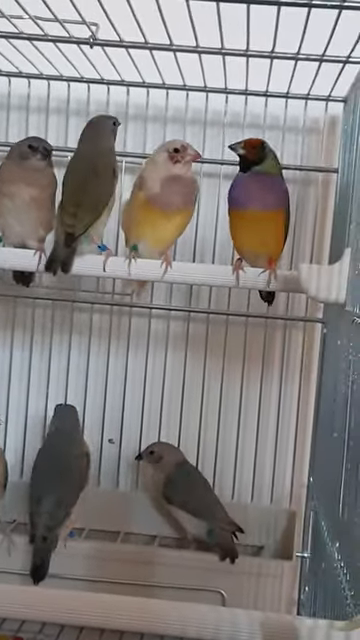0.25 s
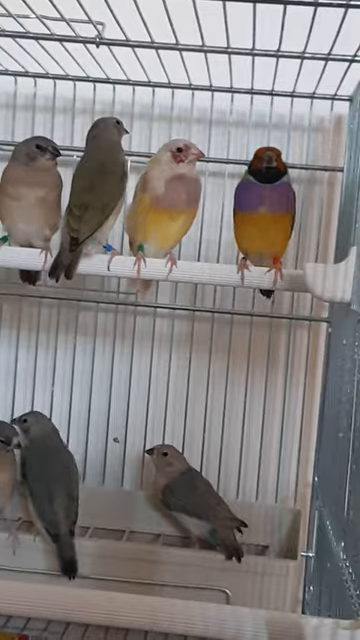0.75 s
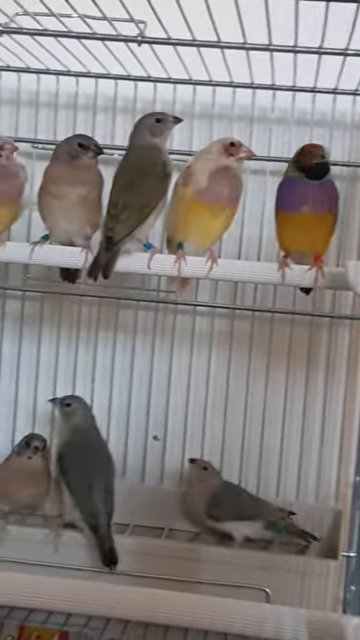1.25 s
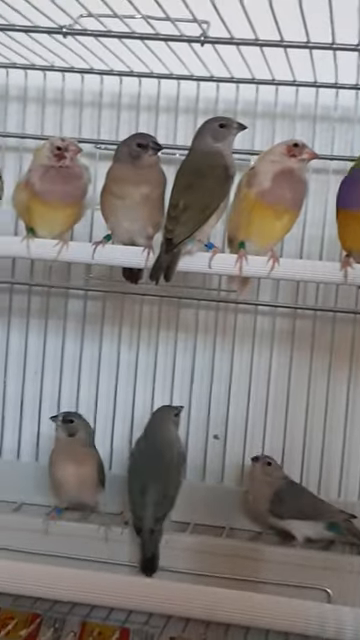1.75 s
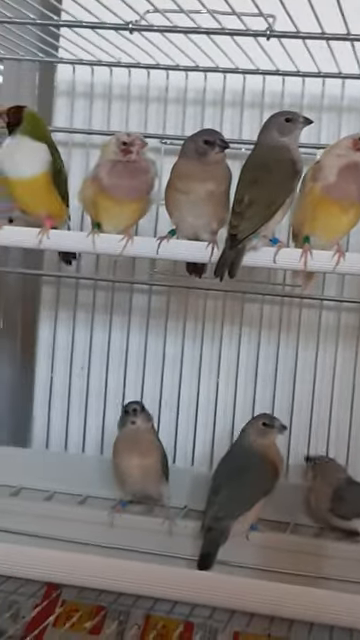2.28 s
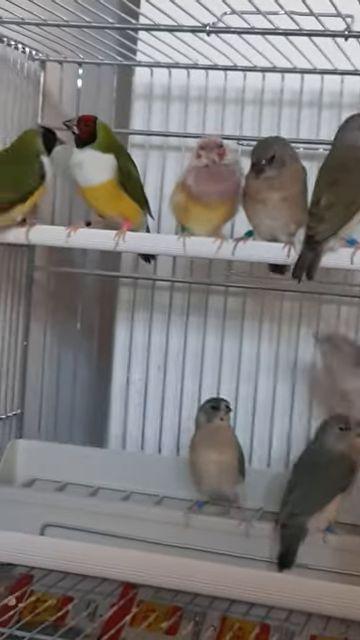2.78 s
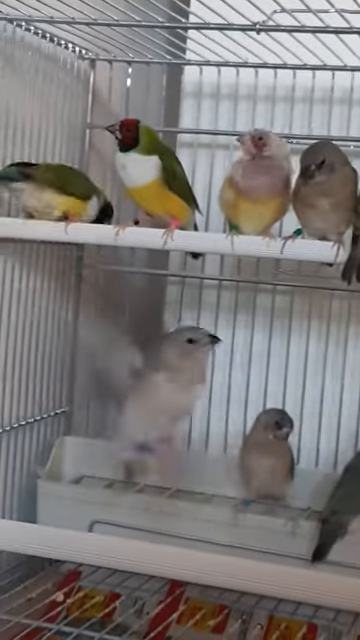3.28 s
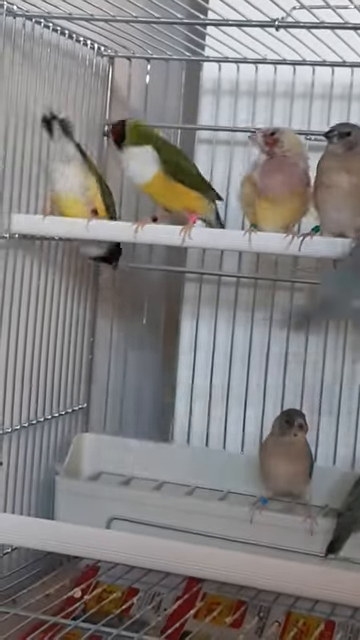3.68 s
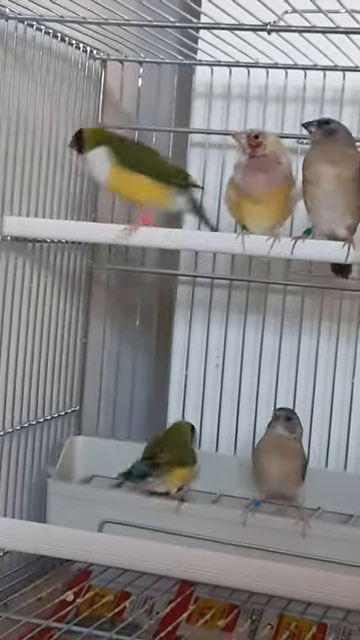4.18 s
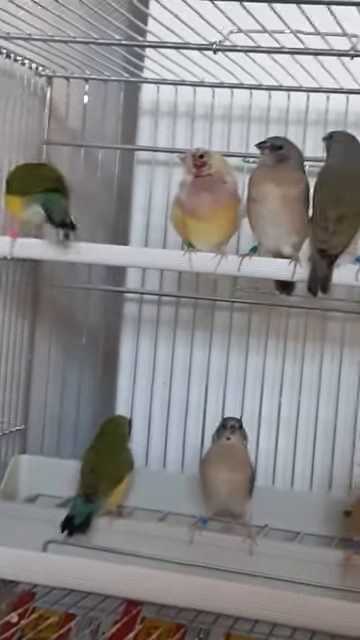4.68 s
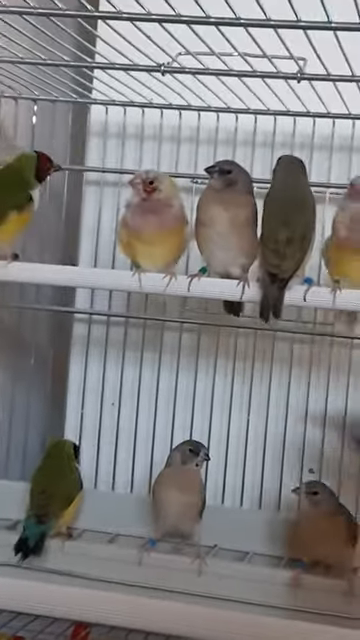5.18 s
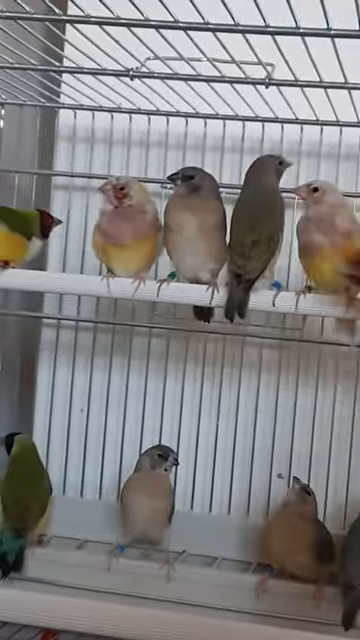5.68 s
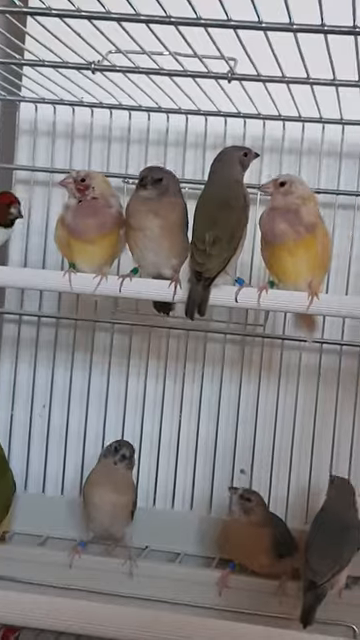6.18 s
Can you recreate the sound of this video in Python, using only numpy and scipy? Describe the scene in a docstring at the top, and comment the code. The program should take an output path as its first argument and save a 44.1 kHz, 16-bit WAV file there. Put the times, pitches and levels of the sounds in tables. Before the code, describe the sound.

Finches move about a wire cage in a small, hard room with a soft, low rumble. Faint calls and light claw ticks open, then one high, wavering call comes at about 1 second with soft fluttering and scuffing. From 2.1 seconds one bird sings a thin song of quick upward flicks, nasal notes and falling, buzzy whistles. Wing flapping swells from 3 to 4 seconds, and a puff of air thumps the microphone's right side at 3.3. Claws tick on the wires, and feet knock on a hollow plastic feeder at 4 seconds, more softly at 5.2. The song is loudest from 4.4 to 4.8 seconds, with short held whistles, then turns reedy as wings briefly thrum near 5. It ends with a falling note at about 5.3. Another flutter comes at 5.9 seconds, with faint, hoarse calls from farther off around 5.8 and 6.3.

```python
"""A small, hard room with finches in a wire cage. One sings a thin song of upward flicks, nasal notes
and falling, buzzing whistles; others call. Their voices come from the syrinx, a bird's voice box, where
thin membranes vibrate. Wings push air and swish as birds flutter past, and one wing gust hits the
right side of the microphone. Claws tick on the wires, feet knock on the feeder, and the room rumbles."""
import sys
import numpy as np
from scipy import signal
from scipy.fft import rfft, irfft, next_fast_len
from scipy.io import wavfile
from scipy.ndimage import map_coordinates

SR = 44100
rng = np.random.default_rng(int(sys.argv[2]) if len(sys.argv) > 2 else 0)


def wav_record(signal):
    """Record a signal, one row per channel, as 16-bit PCM in the file named by sys.argv[1]."""
    frames = np.transpose(np.atleast_2d(signal))
    bounded = np.clip(frames, -1, 1)
    # unit amplitude maps onto the largest positive 16-bit level
    quanta = np.round(bounded * 32767).astype(np.int16)
    wavfile.write(sys.argv[1], SR, quanta)


N = 284004

# Levels in all tables are relative. A "shape" traces one note. Each row of a shape: time in seconds,
# pitch in Hz, level in dB. Playing it can shift all three.
# Rising syllables. Each row: time in seconds, lead-in level in dB, flick level in dB, pitch ratio.
RISES = [(2.128, -51, -87, .995), (2.276, -51, -37, 0.96), (2.446, -48.5, -34.5, 0.98),
         (2.594, -47.5, -34, 0.99), (3.336, -53, -58, 0.92), (3.513, -48.5, -49, 0.94),
         (3.670, -48, -39.5, .99), (3.864, -46.5, -31, 0.96), (4.572, -45, -29.5, 1.01),
         (4.719, -46, -25, 1)]
# Falling syllables. Each row: time in seconds, then the levels of pip, fall and buzz in dB.
FALLS = [(2.932, -34, -33, -44), (4.19, -31, -34, -41.5), (5.238, -37.5, -30, -46.5)]


def song():
    """The singer: sharp accents carry straight to the microphone, soft notes blend with the room."""
    # The open beak colours the whole song. Each row: frequency in Hz, gain in dB.
    beak = [(800, -0.5), (1100, -4.5), (1350, -7), (1900, 0.5), (2250, 1), (2550, -6), (3100, 1.5),
            (4600, -0.5), (5500, -1), (9000, 1.5), (12500, 5.5), (15500, 2)]
    sharp = flicks_and_pips() + falling_whistles()
    held = held_whistles_and_ring()
    soft = soft_notes() + reedy_notes() + thin_voice()
    echoes = room(amp(-4.5) * sharp + amp(-7.5) * held + amp(-5.5) * soft)
    direct = from_perch(sharp + amp(-1.5) * held + amp(-4) * soft)
    return coloured(direct + echoes, beak)


def flicks_and_pips():
    """Tiny, nearly pure whistles: upward flicks, and the pip that opens each falling syllable."""
    # The shapes of a flick and a pip. Each row: time in seconds, pitch in Hz, level in dB.
    flick = [(-.017, 3620, -20), (-.008, 4172, -11), (-.002, 4483, 0), (.002, 4654, -5), (.006, 4350, -30)]
    pip = [(0, 4600, -16.5), (.002, 4570, -2.5), (.006, 4570, 3.5), (.009, 4180, -13.5)]
    flicks = [(s, flick, db, ratio) for s, _, db, ratio in RISES]
    pips = [(s, pip, db, 1) for s, db, _, _ in FALLS]
    out = whistles(flicks, overtones_db=[-41, -47], flutter=0.019, rasp_db=-15, rasp_hz=298)
    return out + whistles(pips, overtones_db=[-46, -46], flutter=.004, rasp_db=-27, rasp_hz=400)


def falling_whistles():
    """Whistles that slide down, with faint overtones (multiples of the pitch)."""
    # The shape of the slide. Each row: time in seconds, pitch in Hz, level in dB.
    fall = [(.006, 3680, 6.5), (.011, 3286, -9.5), (.02, 3118, -6), (0.029, 2880, -9.5), (0.034, 2650, -6),
            (.042, 1840, -15), (0.053, 1695, -9)]
    # Lets overtones stand out near 7 and 13 kHz. Each row: frequency in Hz, gain in dB.
    colour = [(6800, -1), (8000, -8), (11000, -8), (12500, -3)]
    notes = [(s, fall, db, 1) for s, _, db, _ in FALLS]
    out = whistles(notes, overtones_db=[-31, -40, -27], flutter=0.022, rasp_db=-10, rasp_hz=399.3)
    return coloured(out, colour)


def held_whistles_and_ring():
    """Gently bending whistles, clear to hoarse, then a fading ring in the room after the loudest flick."""
    # Each row: start and length in seconds; first, middle and last pitch in Hz; level in dB;
    # loudest point as a share of the length; rasp in dB. The last two rows are the room's ring.
    notes = [(1.065, 0.044, 3080, 3430, 3570, -43.5, 0.97, -2.5),
             (3.741, 0.077, 3726, 3640, 3490, -49, 0.36, 8),
             (4.374, 0.0586, 3403, 3607, 3625, -29.5, 1, -30.5),
             (4.386, 0.049, 3060, 3144, 3310, -42, 0.53, 5),
             (4.455, 0.056, 3666, 3670, 3570, -36, .3, -25.5),
             (4.514, 0.07, 3436, 3820, 4300, -38.5, 0.27, -3),
             (4.655, 0.055, 3260, 3440, 3910, -34, 0.66, -3), (4.716, .09, 4050, 3973, 3790, -38, .2, -10),
             (4.808, 0.19, 3774, 3605, 3550, -47, 0.076, -5)]
    return sum(whistles(as_notes([sweep(*note)]), overtones_db=[-52, -54], flutter=0.0084,
                        rasp_db=rasp_db, rasp_hz=391) for *note, rasp_db in notes)


def soft_notes():
    """Raspy lead-ins to the flicks, buzzes after the falls, and nasal notes ending in a downward slur."""
    # The shapes of these four notes. Each row: time in seconds, pitch in Hz, level in dB.
    lead_in = [(-.088, 1768, -13.5), (-.06, 1787, -3.5), (-.035, 1890, -3.5), (-.01, 2021, -2.5)]
    buzz = [(.05, 395, -11.5), (.062, 391.8, 3), (.08, 378, -3.5), (.1, 349, -38)]
    nasal = [(-.004, 373.2, -15), (.01, 391, -6), (0.028, 411, -1), (0.056, 412, 1.5), (.08, 385, -1)]
    slur = [(.09, 7084, -16), (.1, 5600, 0.5), (.112, 4400, 6), (.125, 3400, -10), (.145, 3000, -3),
            (.155, 1873, -13), (.175, 1610, 1)]
    # Nasal syllables. Each row: time in seconds, nasal level in dB, slur level in dB.
    nasals = [(2.697, -46.5, -44), (3.95, -46, -42.5)]
    leads = [(s, lead_in, db, ratio) for s, db, _, ratio in RISES]
    slurs = [(s, slur, db, 1) for s, _, db in nasals]
    out = amp(-4.5) * whistles(leads, overtones_db=[2, -28], flutter=0.014, rasp_db=-4, rasp_hz=440)
    out += amp(-3.5) * whistles(slurs, overtones_db=[-19], flutter=0.051, rasp_db=-3, rasp_hz=800)
    out += buzzes([(s, db) for s, _, _, db in FALLS], buzz, flutter=0.031, tilt_db=-3)
    return out + buzzes([(s, db) for s, db, _ in nasals], nasal, flutter=0.02, tilt_db=3.5)


def reedy_notes(buzz_db=-1.5):
    """Reedy notes; the other side of the syrinx buzzes along at about a sixth of the pitch."""
    # Each row: start and length in seconds; first, middle and last pitch in Hz; level in dB;
    # loudest point as a share of the length; first overtone in dB; rasp in dB.
    notes = [(4.79, 0.18, 1902, 2310, 2207, -43, 0.31, -21, -11),
             (5.082, .095, 2343, 1879, 1607, -45.5, 0.092, -8, -18)]
    out = np.zeros(N)
    for *note, overtone_db, rasp_db in notes:
        shape = sweep(*note)
        out += whistles(as_notes([shape]), overtones_db=[overtone_db, -24, -30], flutter=0.014,
                        rasp_db=rasp_db, rasp_hz=520)
        out += buzzes([(0, buzz_db)], shape / [1, 6, 1], flutter=0.038, tilt_db=2.5)
    return out


def thin_voice():
    """A faint, raspy voice high above the song."""
    # Each row: start and length in seconds; first, middle and last pitch in Hz; level in dB;
    # loudest point as a share of the length.
    rows = [(3.235, 0.26, 6700, 7160, 7000, -55.5, 0.13), (4.707, 0.32, 6950, 6670, 7000, -57.5, 0.067),
            (4.9, .15, 7050, 7000, 6720, -57.5, 0.98)]
    notes = as_notes([sweep(*row) for row in rows])
    return whistles(notes, overtones_db=[-16], flutter=0.008, rasp_db=-0.5, rasp_hz=620)


def from_perch(x):
    """The straight path from the singer reaches the microphone's two sides unequally."""
    # Each row: frequency in Hz, how much louder the left is in dB.
    left_louder = [(800, 0.5), (2000, -7), (3100, 12), (3700, -1.5), (4500, 5), (7000, 3), (11000, -6)]
    # Each row: frequency in Hz, how far the left wave is ahead in radians.
    left_ahead = [(800, 1.2), (2000, 1.68), (3500, 2.07), (4500, 0.65), (11000, .7)]
    left = lambda hz: amp(along(left_louder, hz) / 2) * np.exp(.5j * along(left_ahead, hz))
    return filtered(x, lambda hz: np.array([left(hz), 1 / left(hz)]))


def syrinx(shape, ratio, flutter, flutter_rate):
    """Pitch, phase and loudness of one note; the membrane's flutter shakes the pitch a little."""
    s, hz, db = np.transpose(shape)
    s = np.sort(s)
    t = np.arange(s[0], s[-1] + .001, 1 / SR)
    pitch = ratio * np.interp(t, s, hz) * (1 + flutter * wobble(flutter_rate, len(t)))
    edges = np.clip(np.minimum(t - t[0], t[-1] - t) / .0015, 0, 1)  # short fades prevent clicks
    loudness = np.sqrt(2) * amp(np.interp(t, s, db)) * np.sin(edges * np.pi / 2) ** 2
    return pitch, 2 * np.pi * np.cumsum(pitch) / SR, loudness


def whistles(notes, overtones_db, flutter, rasp_db, rasp_hz):
    """Play notes (seconds, shape, dB, pitch ratio); an uneven rattle in the syrinx makes them rasp."""
    out = np.zeros(N)
    for s, shape, db, ratio in notes:
        pitch, phase, loudness = syrinx(shape, ratio, flutter, flutter_rate=700)
        wave = sum(amp(level) * np.exp(1j * k * phase) * (k * pitch < SR / 2)
                   for k, level in enumerate([0, *overtones_db], 1))
        jitter = lambda rate: wobble(rate, len(phase)) + 1j * wobble(rate, len(phase))
        rattle = amp(rasp_db) * (0.79 * jitter(2 * rasp_hz) + 0.53 * jitter(5 * rasp_hz))
        raspy = (wave * (1 + rattle)).imag / np.hypot(1, amp(rasp_db))
        add(out, s + shape[0][0], amp(db) * loudness * raspy)
    return out


def buzzes(notes, shape, flutter, tilt_db):
    """Play low, pulsing notes (seconds, dB) whose many overtones are tilted by tilt_db per octave."""
    # The throat colours the buzz. Each row: frequency in Hz, gain in dB.
    throat = [(380, -32), (780, -4.5), (1150, 3), (1500, 1.5), (1950, 2), (2450, -4.5), (3100, -7.5),
              (3800, -14.5), (4600, -1.5), (6000, -22), (8500, -40), (12000, -23.5), (15500, -36.5)]
    out, k = np.zeros(N), np.arange(1, 39)[:, None]  # k counts multiples of the pitch
    for s, db in notes:
        pitch, phase, loudness = syrinx(shape, ratio=0.96, flutter=flutter, flutter_rate=350)
        strengths = amp(along(throat, k * pitch) + tilt_db * np.log2(k))
        wave = (strengths * np.sin(k * phase + rng.uniform(0, np.pi, k.shape))).sum(0)
        add(out, s + shape[0][0], amp(db) * loudness * unit(wave) / np.sqrt(2))
    return out


def as_notes(shapes):
    """Make notes that keep their shapes' own times, levels and pitches."""
    return [(0, shape, 0, 1) for shape in shapes]


def sweep(s, length, start_hz, middle_hz, end_hz, db, crest):
    """Shape of a note whose pitch bends smoothly through three values."""
    progress = np.linspace(0, 1, 33)
    curve = np.polyfit([0, .5, 1], [start_hz, middle_hz, end_hz], 2)
    pitch = np.polyval(curve, progress)
    return np.column_stack([s + progress * length, pitch, swell(progress, db, crest)])


def scoop(s, length, hz, db, crest, overshoot=0.11, settle_s=.022):
    """Shape of a call that drops onto its pitch from above."""
    progress = np.linspace(0, 1, 33)
    pitch = hz * (1 + overshoot * np.exp(-progress * length / settle_s))
    return np.column_stack([s + progress * length, pitch, swell(progress, db, crest)])


def swell(progress, db, crest, rise_db=15, fade_db=12.5, roundness=1.46):
    """Level along a note (progress from 0 to 1): up to its loudest point, the crest, then down."""
    crest = np.clip(crest, .02, .98)
    away = np.interp(progress, [0, crest, 1], [1, 0, 1])
    return db - np.where(progress < crest, rise_db, fade_db) * away ** roundness


def long_call(waver_db=3):
    """Another finch gives one long, wavering call, rich in overtones."""
    # Its shape dips in pitch. Each row: time in seconds, pitch in Hz, level in dB.
    shape = [(1.075, 5250, -63), (1.081, 5280, -59), (1.117, 5430, -45), (1.155, 5070, -60),
             (1.205, 4333, -56), (1.385, 3790, -56.5), (1.409, 4540, -58.5), (1.437, 5180, -54.5),
             (1.45, 5240, -66)]
    call = whistles(as_notes([shape]), overtones_db=[-4, -11], flutter=.016, rasp_db=-10, rasp_hz=440)
    call *= amp(waver_db * wobble(89.9))
    return panned(amp(0.5) * call + amp(1) * room(call), left_db=3)


def far_calls():
    """Hoarse calls from farther off, heard mostly by way of the room."""
    # Each row: start and length in seconds, pitch in Hz, level in dB, loudest point from 0 to 1.
    calls = [(0, 0.033, 5810, -52.5, 0.062), (0.445, 0.12, 3570, -53, 0.41), (1.048, 0.058, 3543, -40, 1),
             (2.178, 0.063, 3570, -51, 1), (5.774, 0.093, 3610, -49.5, 0.91),
             (6.303, 0.11, 3553, -50, 0.73), (6.297, .13, 6250, -53.5, 0.87)]
    # The callers' tone colour. Each row: frequency in Hz, gain in dB.
    throat = [(2400, -12.5), (3400, 0), (4700, 1.5), (7000, -5)]
    notes = as_notes([scoop(*call) for call in calls])
    rasp = whistles(notes, overtones_db=[-22], flutter=0.0204, rasp_db=0, rasp_hz=1013)
    core = whistles(notes, overtones_db=[-28], flutter=0.018, rasp_db=-19, rasp_hz=195)
    voices = coloured(amp(-3) * rasp + amp(-8.5) * core, throat)
    return panned(amp(-8.5) * voices + amp(-5) * room(voices), left_db=6.5)


def wings(strokes_per_s=61, unevenness=.16, rise_s=0.048, fall_s=0.071):
    """Every up and down stroke pushes a lump of air and swishes the feathers."""
    # Bursts of wing beating. Each row: start and length in seconds, air push in dB, swish in dB.
    flutters = [(.01, 0.037, -52, -71.5), (0.92, 0.035, -75, -90), (1, 0.45, -62.5, -73),
                (1.572, 0.018, -58.5, -76), (1.764, 0.018, -54.5, -86), (1.85, 0.25, -58.5, -84.5),
                (2.224, 0.039, -59, -65), (2.544, 0.041, -50.5, -70), (2.984, 0.36, -45, -61.5),
                (3.475, 0.064, -40, -51.5), (3.671, 0.081, -39, -52.5), (3.84, 0.24, -57.5, -56.5),
                (4.186, 0.49, -57.5, -65), (4.546, .2, -64.5, -59.5), (4.874, .1, -53, -63),
                (5.098, 0.038, -61, -61.5), (5.27, 0.19, -59, -86), (5.58, 0.042, -51.5, -72),
                (5.889, 0.052, -40, -52.5), (6.393, .05, -60.5, -67.5)]
    # The tone colour of swishing feathers. Each row: frequency in Hz, level in dB.
    feathers = [(130, -6.5), (280, 0), (450, -1), (800, -7), (1500, -8.5), (3000, -13), (5500, -12.5),
                (8500, -16.5), (11500, -15.5), (15500, -23)]
    # The small steady gains are there because the flock is never quite still.
    air = amp(-72) + bursts([(s, length, db) for s, length, db, _ in flutters], rise_s, fall_s)
    rustle = amp(-84) + bursts([(s, length, db) for s, length, _, db in flutters], rise_s, fall_s)
    strokes = np.cumsum(strokes_per_s * np.exp(unevenness * wobble(14))) / SR  # a running count
    push = air_push(strokes)
    swish = feather_swish(strokes)
    return air * push + hover_thrum() + rustle * swish * noise(feathers)


def air_push(strokes, upstroke_db=-5.5):
    """One low thump a stroke, mixed with low noise; the upstroke pushes less air."""
    # The tone colour of pushed air. Each row: frequency in Hz, level in dB.
    colour = [(20, -39.5), (35, -7), (55, 4.5), (80, 5.5), (120, -3.5), (190, -6), (300, -15), (480, -24.5),
              (900, -32), (2000, -94)]
    count = np.floor(strokes)
    kicks = np.diff(count, prepend=0) * amp(upstroke_db * (count % 2) + 2.7 * wobble(45))
    thumps = -coloured(kicks, colour)
    return unit(unit(thumps) + amp(-2) * noise(colour))


def feather_swish(strokes, brushes_per_s=47, brush_s=0.0075, brush_db=1):
    """Loudness of the feathers: they swish most on the way down, and their tips brush at random."""
    stroke_db = 4 * np.cos(2 * np.pi * strokes) + 1.5 * np.cos(np.pi * strokes) + 1.5 * wobble(25)
    snaps = (rng.random(N) < brushes_per_s / SR) * rng.random(N)
    brushes = signal.lfilter([1], [1, -np.exp(-1 / (brush_s * SR))], snaps)  # each snap dies away
    return unit(amp(stroke_db) + amp(brush_db) * brushes)


def hover_thrum():
    """Wings thrum as a bird hovers by the bars."""
    # The thrum's shape. Each row: time in seconds, pitch in Hz, level in dB.
    shape = [(4.8, 128.8, -58), (4.85, 135.3, -51.5), (4.93, 115.7, -56.5), (4.98, 134, -49.5),
             (5.04, 149.4, -49.5), (5.09, 137, -56)]
    return whistles(as_notes([shape]), overtones_db=[-16], flutter=0.038, rasp_db=-8.5, rasp_hz=40.6)


def gust(start_s=3.3122, db=-7, rise_s=0.00024, fall_s=0.0071, cut_hz=56):
    """A puff of air strikes the microphone's right side; its bass cut makes the puff swing."""
    t = np.arange(SR // 5) / SR
    puff = -np.exp(-t / fall_s) * (1 - np.exp(-t / rise_s))
    bass_cut = signal.butter(4, cut_hz, "high", fs=SR, output="sos")
    out = np.zeros(N)
    add(out, start_s, amp(db) * signal.sosfilt(bass_cut, puff))
    return out * amp([[-28], [0]])


def cage_taps(tick_ring_s=0.054, knock_ring_s=0.032, attack_s=0.00077, scatter_db=1.5):
    """Claws and beaks tick on the wires, and landing feet make the hollow plastic feeder ring."""
    # Ticks on the wires and landings on the feeder. Each row: start in seconds, level in dB.
    ticks = [(0.093, -64), (0.8575, -55.5), (0.8827, -53.5), (0.9044, -51.5), (0.936, -56.5), (2.2145, -63),
             (2.248, -56), (3.3108, -38.5), (3.4705, -49), (3.5034, -46), (3.7815, -42.5), (4.0048, -39),
             (5.0355, -49.5), (5.088, -41.5), (5.235, -58), (5.9529, -47), (6.0072, -54.5)]
    landings = [(.886, -84), (0.904, -53), (4.005, -29.5), (4.011, -37.5), (5.238, -42.5), (5.862, -55)]
    # The tones the feeder rings with. Each row: frequency in Hz, level in dB.
    feeder = [(790, -6.5), (1080, -0.5), (1370, 2), (1490, -16.5), (1750, -7.5), (2040, -18.5)]
    out, t = np.zeros(N), np.arange(SR // 4) / SR
    rise = 1 - np.exp(-t / attack_s)
    for s, db in ticks:
        add(out, s, amp(db - 4 - 60 * t / tick_ring_s) * rise * rng.standard_normal(len(t)))
    for s, db in landings:
        ring = np.zeros(len(t))
        for hz, level in feeder:
            strength = amp(level + rng.normal(0, scatter_db))
            phase = 2 * np.pi * hz * t + rng.uniform(0, 2 * np.pi) + 1.24 * wobble(550, len(t))
            ring += strength * np.sin(phase)
        add(out, s, amp(db - 60 * t / knock_ring_s) * rise * unit(ring))
    return panned(out + amp(-2) * room(out), left_db=2.5)


def scuffs():
    """Shuffling feet rub the feeder in uneven bursts of noise."""
    # Each row: start and length in seconds, level in dB.
    shuffles = [(.87, 0.049, -66), (1.08, 0.022, -68), (1.7, 0.23, -76.5), (1.88, 0.052, -71.5)]
    # The tone colour of the rubbing. Each row: frequency in Hz, level in dB.
    colour = [(500, -37), (900, 0), (1300, 2), (1850, 3), (2300, -7), (3200, -44)]
    return bursts(shuffles, rise_s=0.02, fall_s=0.049) * amp(3.6 * wobble(45)) * noise(colour)


def room(x):
    """The room's echo, a tail of fading noise; it changes as the birds move about."""
    # Each row: frequency in Hz, seconds the echo takes to fade by 60 dB.
    fade_times = [(150, 0.14), (1000, 0.55), (2000, 0.38), (4000, 0.62), (7000, 0.36), (14000, 0.59)]
    out, step = np.zeros((2, N)), SR // 3
    for start in range(0, N, step):
        hz, t, spectrum = signal.stft(rng.standard_normal((2, 2 * step)), SR, nperseg=256)
        decay = amp(-60 * t / along(fade_times, hz)[:, None])
        tail = signal.istft(spectrum * decay, SR, nperseg=256)[1]
        tail[:, :SR // 300] = 0  # a short gap before the echo arrives
        tail /= np.linalg.norm(tail[0])
        blend = np.clip(1 - abs(np.arange(N) - start) / step, 0, 1)  # each tail hands over to the next
        first = max(start - step, 0)
        piece = (x * np.sqrt(blend))[first:start + step]
        add(out, first / SR, signal.fftconvolve(piece[None], tail, axes=1))
    return out


def room_rumble():
    """Soft, low noise whose level wavers slightly."""
    # The room's background sound. Each row: frequency in Hz, level in dB.
    colour = [(22, -30), (35, -5), (50, 0), (70, -8), (100, -22.5), (135, -7), (170, -25.5), (250, -22.5),
              (400, -34.5), (800, -39.5), (2000, -46.5), (4000, -47.5), (8000, -57), (12500, -48),
              (15500, -49.5)]
    return panned(amp(-57 + 2 * wobble(8.6)) * noise(colour), left_db=3)


def noise(colour):
    """Coloured stereo noise of average power 1, more alike left and right in the bass."""
    # Each row: frequency in Hz, how alike the two sides are (1 means the same).
    alike = [(40, 0.99), (200, 0.61), (600, 0.3), (2000, 0.045), (10000, 0.034)]

    def response(hz):
        angle = np.arccos(np.clip(along(alike, hz), -1, 1)) / 2
        return amp(along(colour, hz)) * [np.cos(angle), np.sin(angle)]

    mid, side = filtered(rng.standard_normal((2, N)), response)
    return unit(np.array([mid + side, mid - side]))


def bursts(rows, rise_s, fall_s):
    """Gain of bursts (start, length, dB) that build up, hold and die away; their powers add."""
    t = np.arange(N) / SR
    gains = [amp(db) * np.exp(-np.maximum(s - t, 0) / rise_s - np.maximum(t - s - length, 0) / fall_s)
             for s, length, db in rows]
    return np.linalg.norm(gains, axis=0)


def amp(db):
    """Turn decibels into a gain."""
    return 10 ** (np.asarray(db) / 20)


def unit(x):
    """Scale to an average power of 1."""
    return x / np.sqrt(np.mean(x ** 2) + 1e-20)


def along(points, hz):
    """Read between (Hz, value) points, with octaves evenly spaced."""
    frequencies, values = np.transpose(points)
    return np.interp(np.log(hz + 1), np.log(frequencies + 1), values)


def wobble(rate, size=N):
    """A smooth curve through `rate` random values a second."""
    values = rng.standard_normal(int(size * rate / SR) + 4)
    return map_coordinates(values, [np.arange(size) * rate / SR])


def filtered(x, response):
    """Multiply each frequency in x by response(hz)."""
    size = next_fast_len(N + SR // 2)
    return irfft(rfft(x, size) * response(np.fft.rfftfreq(size, 1 / SR)), size)[..., :N]


def coloured(x, colour):
    """Filter x by a table of (Hz, dB) points."""
    return filtered(x, lambda hz: amp(along(colour, hz)))


def add(track, s, sound):
    """Mix a sound into a track at s seconds."""
    start = max(round(s * SR), 0)
    part = track[..., start:start + sound.shape[-1]]
    part += sound[..., :part.shape[-1]]


def panned(x, left_db):
    """Make the left side louder than the right by left_db."""
    return x * amp([[left_db / 2], [-left_db / 2]])


def scene():
    """Voices, wings, the cage and the room's rumble together."""
    return song() + long_call() + far_calls() + wings() + gust() + cage_taps() + scuffs() + room_rumble()


def record(dry, top_hz=15740):
    """The microphone colours the sound, and everything above top_hz is cut."""
    # A dip in the treble. Each row: frequency in Hz, gain in dB.
    microphone = [(6300, -0.5), (8200, -8), (10500, 0.5)]
    return filtered(dry, lambda hz: amp(along(microphone, hz)) * (hz < top_hz))


dry = scene()
out = record(dry)
wav_record(out)
```